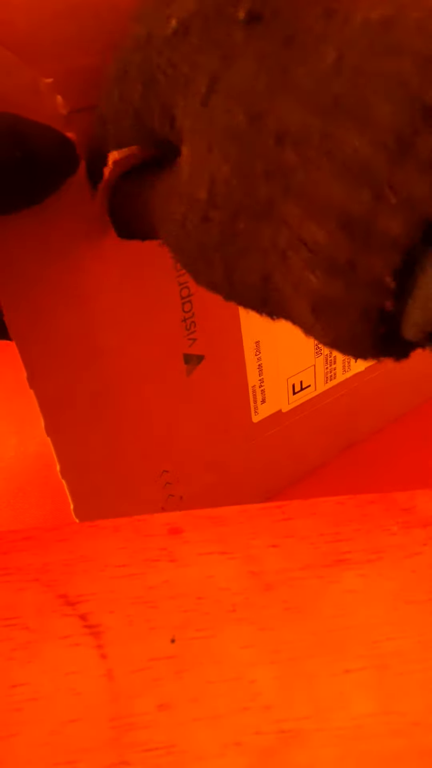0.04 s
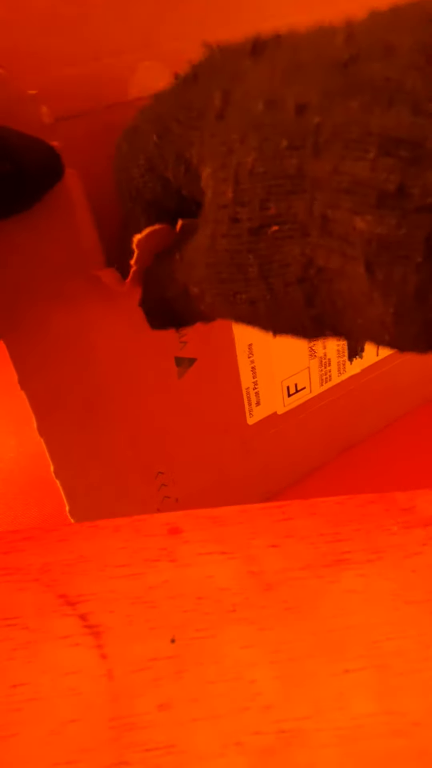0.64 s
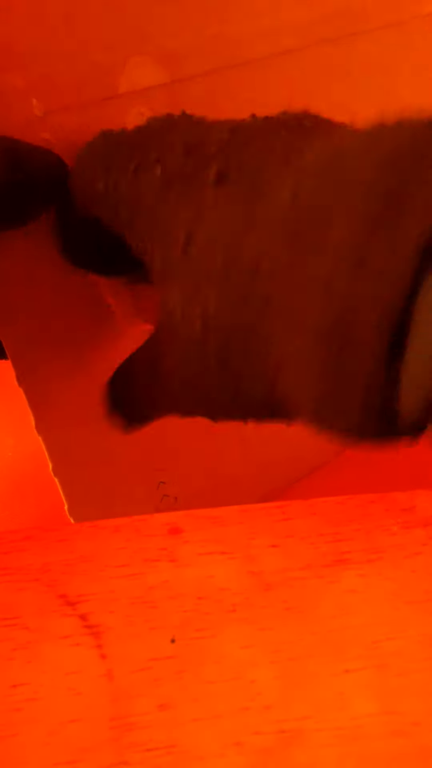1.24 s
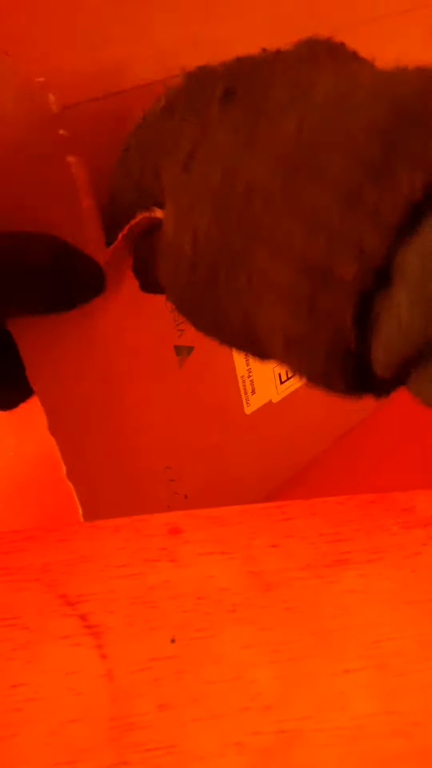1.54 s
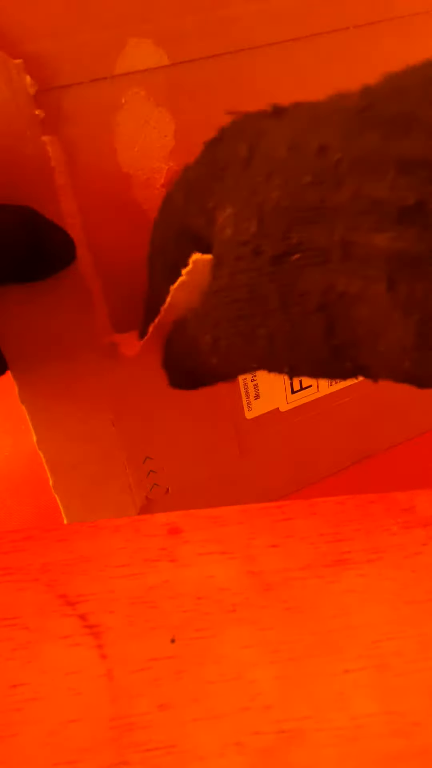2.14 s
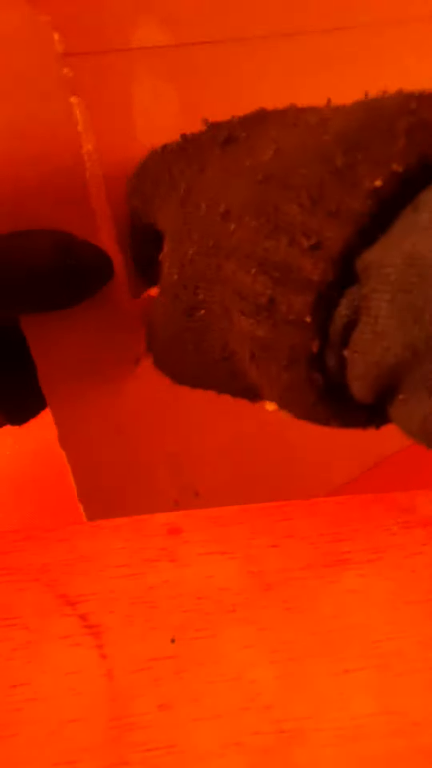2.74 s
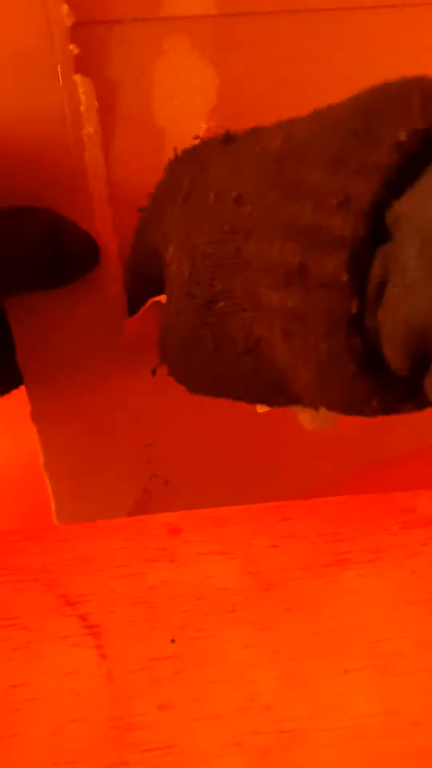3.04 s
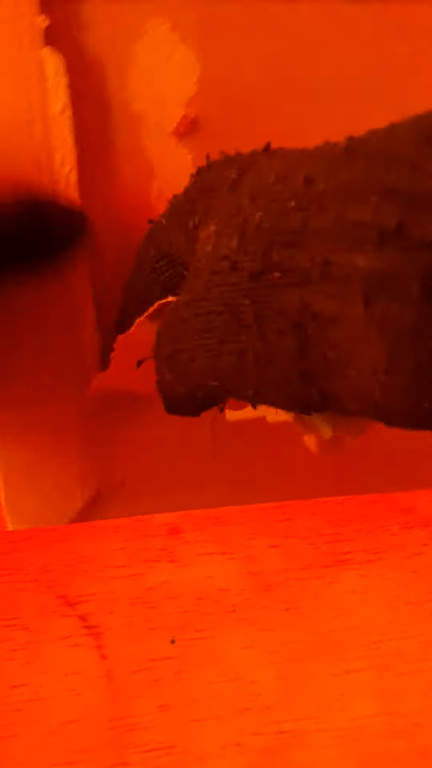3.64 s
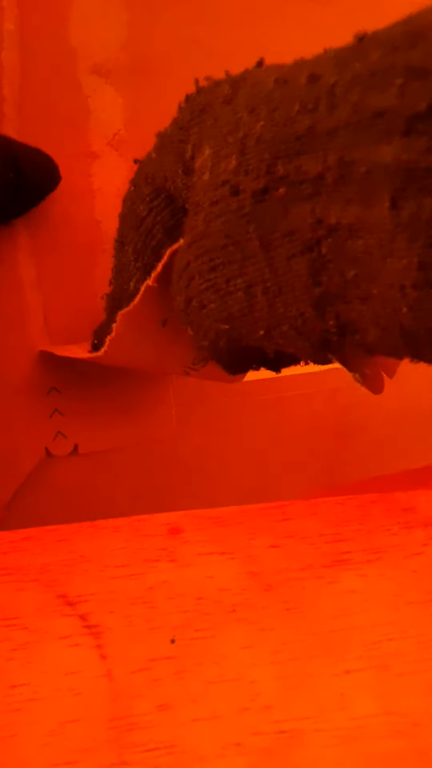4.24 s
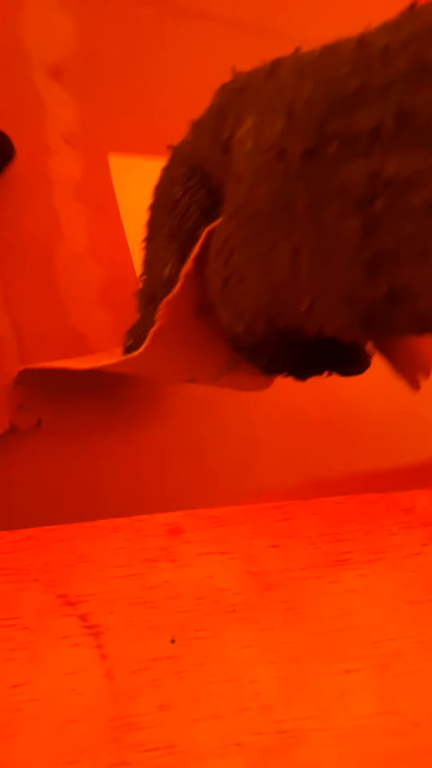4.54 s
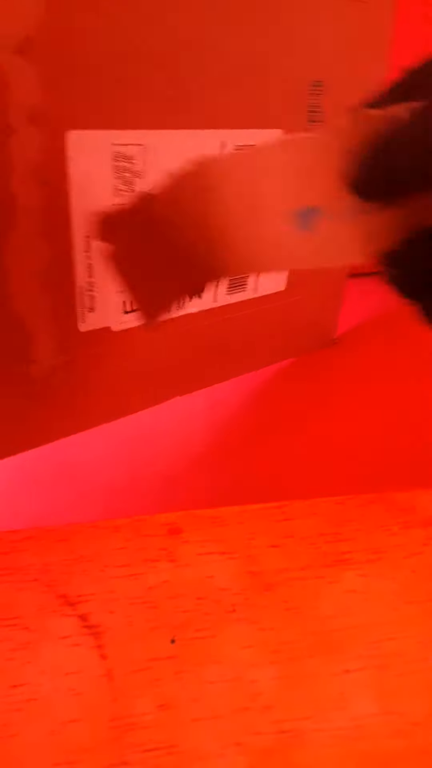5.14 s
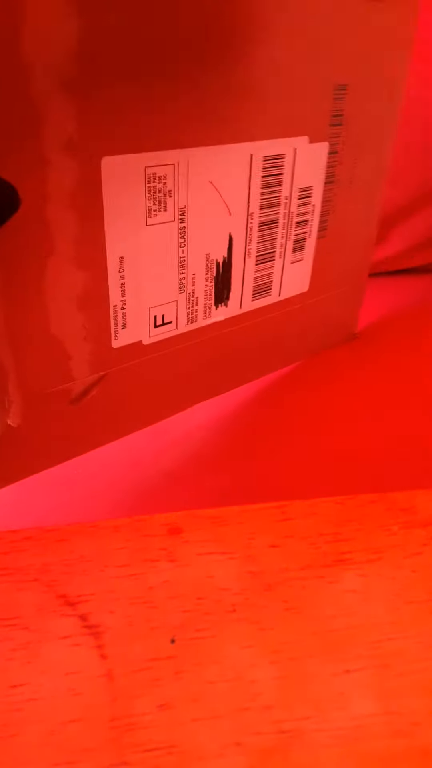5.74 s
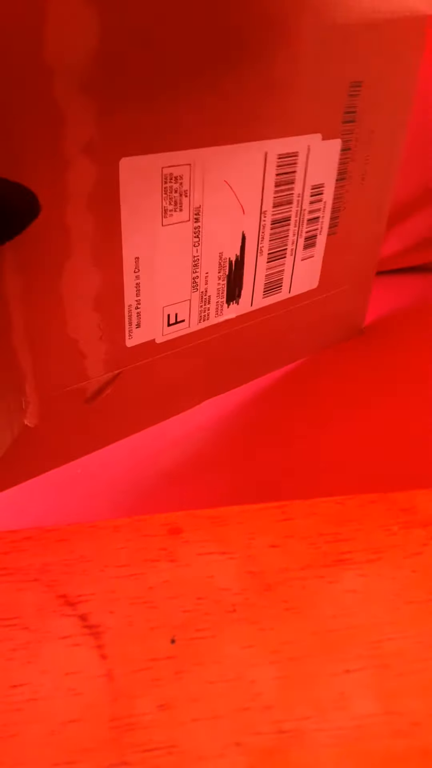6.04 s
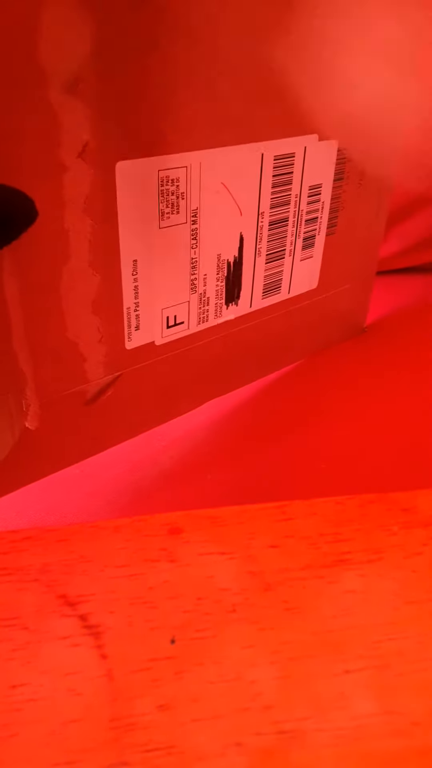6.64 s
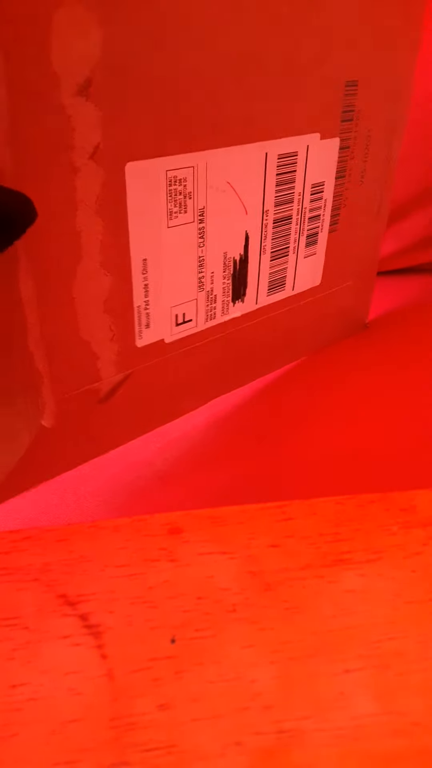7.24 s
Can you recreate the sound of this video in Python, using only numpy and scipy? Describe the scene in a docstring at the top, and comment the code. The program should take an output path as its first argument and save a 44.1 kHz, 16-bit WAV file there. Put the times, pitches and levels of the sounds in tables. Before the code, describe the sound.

Gloved hands tear a strip off a cardboard box in crackling bursts, with sharp snaps and hollow knocks on a wooden table.

```python
"""Cardboard tearing: gloved hands pull a strip off a box on a wooden table in a small room.
Breaking fibres crackle, fizz and shake the panels; glued spots snap; the hollow box pops.
The box knocks on the table as it is turned, panels thud, the flap groans, gloves rub.
The two ports of a nearby phone hear each spot with a lag; the right one sits in a resonant recess."""
import sys
import numpy as np
from scipy import signal
from scipy.fft import rfft, irfft
from scipy.io import wavfile

SR = 44100
rng = np.random.default_rng(int(sys.argv[2]) if len(sys.argv) > 2 else 0)


def unload_audio(sound):
    """Save the sound as a 16-bit wav file, at the path given as the first command line argument."""
    columns = np.transpose(np.atleast_2d(sound))
    # keep every value between -1 and 1, then stretch to whole-number steps
    steps = np.round(np.clip(columns, -1, 1) * 32767)
    wavfile.write(sys.argv[1], SR, steps.astype(np.int16))


N = 325458
TIME = np.arange(N) / SR

# Event and envelope levels are relative within a layer; panel and fizz are relative to the crackle.
# tear runs (time at full speed [s], length [s], crackle [dB], build-up [s], panel [dB], fizz [dB])
TEAR_RUNS = [(.49, 0.023, -34, .035, -4.5, -3.5), (0.572, 0.081, -32.5, .07, -2.5, -4),
             (1.595, 0.0038, -39, 0.09, 0.5, -4), (1.676, 0.027, -37.5, 0.087, 3.5, -3),
             (1.728, .16, -38.5, 0.096, 0, -5), (1.911, 0.027, -33.5, 0.034, 3.5, -3),
             (1.935, 0.022, -25, 0.013, 1.5, -6.5), (1.97, 0.018, -37.5, .03, -16, 5.5),
             (3.183, 0.13, -33.5, 0.048, -1.5, -5), (3.249, 0.015, -29, 0.068, 4.5, -1.5),
             (3.96, 0.051, -39, 0.015, -2.5, 0), (4.36, 0.091, -33, 0.048, -1.5, -1.5),
             (4.566, 0.03, -32, 0.025, -4, 4.5), (4.662, 0.023, -33, 0.07, -5.5, -3.5),
             (4.737, .003, -33.5, 0.01, -0.5, 2.5), (4.755, 0.015, -30, .006, 2, 0.5),
             (6.077, 0.0051, -39.5, 0.0029, 4.5, -8.5), (6.973, 0.02, -31.5, 0.0025, -4, -8),
             (7.005, 0.016, -26.5, 0.021, -6.5, -8.5)]
# flap gripped, bent or peeled slowly (middle [s], length [s], crackle [dB], panel [dB], fizz [dB])
RUSTLES = [(.287, 0.11, -41, -2.5, -8), (0.371, 0.047, -47.5, -2, -5), (0.963, 0.16, -50, 2, -3.5),
           (1.309, .08, -46.5, 1.5, -7), (1.42, .22, -46, -1.5, -3.5), (2.15, 0.066, -53, 0, -1),
           (2.331, 0.043, -49, 5, -11), (2.498, 0.1, -56.5, 1, -2.5), (2.792, 0.22, -48, -0.5, -6),
           (2.978, 0.23, -41, 0.5, -4.5), (3.092, 0.27, -44, -2.5, -6.5), (3.68, 0.17, -53.5, -7, -3.5),
           (3.881, 0.15, -45.5, -3.5, -4), (4.1, 0.24, -56.5, -1, 2), (4.3, 0.069, -43.5, -2.5, 0),
           (4.54, 0.11, -38, -3.5, 1.5), (4.712, .045, -38.5, -9, -2), (4.958, 0.074, -51.5, -5, -3.5),
           (5.249, 0.028, -54.5, -3.5, -3), (5.71, 0.037, -50.5, -16, -1.5),
           (5.786, 0.077, -52.5, -2.5, -2.5), (5.948, 0.089, -58, 0.5, -4.5),
           (6.424, 0.028, -47.5, -1.5, 1), (6.532, 0.034, -49.5, 1.5, -2), (6.63, 0.037, -47, 10.5, -4),
           (6.71, 0.037, -45.5, 7, -8), (6.78, 0.051, -55, -11, 5), (6.826, 0.031, -45, -19, 5),
           (7.252, 0.062, -52.5, 9, -7)]
# creasing under the hands (time [s], crackle [dB])
GRIP = [(0, -53), (.41, -59), (.76, -54), (.82, -68), (.9, -55.5), (1.22, -58.5), (2.3, -56.5),
        (2.395, -79), (2.48, -58.5), (5.1, -60), (5.33, -67), (5.88, -66), (6.05, -89), (6.15, -64.5),
        (6.85, -52.5), (6.95, -69), (7.1, -59.5), (7.38, -62.5)]
# radiating spots on the box (left-port lead [ms], level [dB])
SPOTS = [(.43, 2), (.57, -7), (1.18, -3.5)]
# travel of tear and hands (time [s], lead change [ms])
TRAVEL = [(0, -0.049), (2.5, -0.028), (4.7, -0.083), (5.7, -0.04), (7.38, 0.023)]
# breaking fibres (frequency [Hz], gain [dB])
CRACKLE_SPECTRUM = [(700, -16), (1400, -5), (1800, 2.5), (2300, -1), (3000, 0.5), (4200, 3.5), (5200, -2),
                    (7000, -6.5), (12000, -41)]
# paper fizz (frequency [Hz], gain [dB])
FIZZ_SPECTRUM = [(3500, -29.5), (6500, -7.5), (8500, 4), (10000, 2), (11500, 6.5), (16000, -1)]
# panel rattle (frequency [Hz], gain [dB])
PANEL_SPECTRUM = [(20, -53), (70, 0), (130, -5), (210, 2.5), (350, -3), (500, -6), (760, -1.5),
                  (1050, -6.5), (1300, -4.5), (1600, -17), (2300, -67.5)]
# glued spots and creases giving way (time [s], level [dB], nominal pitch [Hz], fizz [dB])
SNAPS = [(.099, -27.5, 4200, -7.5), (.2425, -23.5, 2300, -16), (0.2777, -23, 2150, -28),
         (.3563, -18.5, 2060, -18), (0.4273, -21.5, 2880, -21), (.506, -21.5, 4000, 1),
         (0.542, -15.5, 2500, -21), (.562, -3.5, 2550, -35), (.574, -9, 2450, -32),
         (1.9315, -18, 1240, -14), (1.9588, -5.5, 3720, -9.5), (2.66, -34, 2500, -6),
         (2.786, -31, 2500, -3.5), (3.0759, -17, 2500, -30), (3.1798, -20, 2500, -21),
         (3.956, -27, 2980, -14), (4.113, -38.5, 4000, 5.5), (4.416, -17.5, 2620, -2),
         (4.565, -9, 3770, -11), (4.7447, -5.5, 3330, -4), (4.759, -23, 3680, 0), (5.787, -27, 4160, -12),
         (6.0757, -15, 2550, -27), (6.231, -28.5, 3900, -10), (6.242, -30, 3900, -9),
         (6.622, -32.5, 1560, -2), (6.7016, -37, 2470, 1.5), (6.971, -20.5, 3050, -5),
         (6.988, -5.5, 2800, -14), (7.007, -5, 3970, -30), (7.017, -7.5, 3300, -13), (7.027, -8, 3360, -19)]
# liner letting go (time [s], level [dB])
POPS = [(.356, -31.5), (.488, -26), (.503, -26.5), (1.907, -23.5), (2.781, -31), (3.2, -28), (3.252, -18),
        (3.773, -37.5), (4.82, -28.5)]
# box hitting the table (time [s], level [dB], blow pitch [Hz])
KNOCKS = [(.103, -30.5, 333), (1.934, -13.5, 755), (2.325, -37, 506), (3.078, -27.5, 393),
          (3.258, -22, 345), (5.621, -37, 820), (5.91, -30, 780), (6.408, -41, 500), (6.571, -31, 417),
          (6.622, -20, 567), (6.651, -29, 305), (6.706, -21, 216), (6.719, -8.5, 373), (6.874, -25, 865),
          (6.899, -11, 392), (7.069, -19.5, 334), (7.211, -36, 360)]
# box resonances (frequency [Hz], relative gain [dB], t60 [s])
BOX_MODES = [(283.6, 7, 0.22), (363, 8.5, 0.066), (567, -10.5, 0.23), (667, 4.5, 0.024), (801.5, 1, 0.044),
             (916, -39, 0.048), (1330, 9.5, 0.21), (2473, 10, 0.052), (2600, -6, 0.18), (3190, 9, 0.038),
             (3990, -10, 0.044), (3710, 2, 0.044), (4266, 7, 0.034), (5656, 9, 0.16)]
# table resonances (frequency [Hz], relative gain [dB], t60 [s])
TABLE_MODES = [(277.4, 4.5, 0.11), (546, 8, 0.092)]
# panels buckling and springing back (time [s], level [dB], pitch [Hz])
FLEXES = [(.101, -34, 154), (1.792, -24, 190), (1.936, -28, 77.5), (1.953, -18, 274), (2.089, -31, 103),
          (2.137, -30.5, 147), (3.254, -15, 158), (3.275, -14.5, 91), (3.294, -21.5, 132),
          (4.565, -21, 206), (4.755, -19, 75.6), (4.789, -20, 162), (6.0766, -25.5, 300), (6.08, -36, 85),
          (6.703, -21.5, 110), (6.722, -29, 71), (6.783, -28.5, 117), (6.989, -20, 302),
          (7.009, -23.5, 352), (7.072, -29, 92.5)]
# gloves sliding (time [s], level [dB])
GLOVE_SLIDE = [(0, -90), (.7, -48), (.85, -64.5), (1.15, -50.5), (2.2, -74), (2.4, -61.5), (2.6, -71),
               (3.5, -50.5), (4.1, -65), (4.96, -53.5), (5.05, -78), (5.33, -65), (5.43, -56), (5.78, -57),
               (6.03, -74), (6.15, -59), (6.4, -51.5), (7.38, -52.5)]
# glove rub on the hollow box (frequency [Hz], gain [dB])
GLOVE_SPECTRUM = [(60, -13), (200, -7.5), (300, -0.5), (370, -0.5), (520, -9.5), (900, -26), (2000, -25)]
# room noise (frequency [Hz], gain [dB])
ROOM_NOISE_SPECTRUM = [(20, -77), (50, -46), (100, 4), (300, -41), (550, -19), (1500, -19), (5000, -13),
                       (16000, -25)]
# right-port recess (frequency [Hz], gain [dB])
RECESS_SPECTRUM = [(80, -6.5), (200, -4), (430, 5.5), (600, -6.5), (740, 2.5), (840, 10), (1080, 1.5),
                   (1400, -2.5), (1850, -9), (2300, 9.5), (2600, 3), (2950, -1), (4400, -3), (6400, -5.5),
                   (9000, -4), (15000, 2.5)]

TOP_HZ = 16000


def tearing():
    """A harder pull breaks more fibres; they go in clumps as the tear catches across the flutes."""
    crackle_db, panel_db, fizz_db = pull_levels_db()
    breaks_per_s = 1300 * undb(.5 * (crackle_db + 40.5))
    clumps = undb(2 * wander(260) + .12 * wander(50))
    breaks = sum(undb(db) * travelling(clumps * fibres(breaks_per_s), lead_ms) for lead_ms, db in SPOTS)
    breaks = through(breaks, box_response(ring_db=-7.5))
    # one excitation, three colours in shifting proportions
    crackle = level(through(breaks, colour(CRACKLE_SPECTRUM)), .037) * undb(crackle_db)
    fizz = level(through(breaks, colour(FIZZ_SPECTRUM)), 2.1) * undb(fizz_db + .15 * wander(120))
    panel = level(through(breaks, colour(PANEL_SPECTRUM)), -2.23) * undb(panel_db + 1.13 * wander(120))
    return crackle + fizz + panel


def fibres(breaks_per_s, spread_db=.5):
    """Random fibre breaks of similar size over smooth rubbing."""
    breaks = rng.random(N) < breaks_per_s / SR
    sizes = undb(spread_db * np.minimum(rng.exponential(size=N), 3.8))
    signs = rng.choice([-1, 1], N)
    rubbing = .45 * rng.standard_normal(N)
    return level(breaks * sizes * signs / np.sqrt(breaks_per_s), 0) + rubbing


def pull_levels_db():
    """Crackle, panel and fizz envelopes: grip, rustles and tear runs add in power."""
    time_s = TIME[::32]
    grip_db = np.interp(time_s, *np.transpose(GRIP))
    power = undb(grip_db + np.c_[[0, -1, -4.5]]) ** 2  # rows: crackle, panel, fizz
    for middle_s, length_s, db, panel_db, fizz_db in RUSTLES:
        shape_db = swell_db(time_s - middle_s, length_s)
        power += undb(db + np.c_[[0, panel_db, fizz_db]] + shape_db) ** 2
    release_db_per_s = np.c_[[248.5, 244, 248.5]]
    for peak_s, length_s, db, build_up_s, panel_db, fizz_db in TEAR_RUNS:
        shape_db = tear_run_db(time_s - peak_s, length_s, build_up_s, release_db_per_s)
        power += undb(db + np.c_[[0, panel_db, fizz_db]] + shape_db) ** 2
    return [np.interp(TIME, time_s, 10 * np.log10(row)) for row in power]


def tear_run_db(age_s, length_s, build_up_s, release_db_per_s, sag_db_per_s=38):
    """One run gains 20 dB over the build-up, slackens, then dies away."""
    rise_db = 20 * np.minimum(age_s, 0) / build_up_s
    sag_db = sag_db_per_s * np.clip(age_s, 0, length_s)
    release_db = release_db_per_s * np.maximum(age_s - length_s, 0)
    return rise_db - sag_db - release_db


def swell_db(offset_s, length_s, edge_db=-8.5):
    """Smooth rise and fall around zero offset."""
    return edge_db * (2 * offset_s / length_s) ** 2


def snaps():
    """Glue or a crease gives: a jerk of the stiff liner and a short spray of breaking fibres."""
    track = np.zeros((2, N))
    decay = fade(t60_s=.009)
    for time_s, db, hz, fizz_db in SNAPS:
        crack_noise, fizz_noise = rng.standard_normal((2, SR // 4))[:, :len(decay)]
        crack = .22 * level(band(crack_noise, hz / 2.3, hz * 2), 0)
        fizz = level(band(fizz_noise, 5900, TOP_HZ), fizz_db)
        cycles = 1.15 * hz * TIME[:len(decay)]
        jerk = np.sin(2 * np.pi * cycles) * np.exp(-.8 * cycles)  # a cycle or two: wideband
        snap = (crack + fizz) * decay + 1.5 * band(jerk, 980, 13000)
        add(track, time_s, ports(undb(db) * snap, lead_ms=.43, scatter_db=-6))
    return track


def pops(centre_hz=815, width_hz=370):
    """The liner lets go: a dry burst around the resonance of the hollow box."""
    track = np.zeros(N)
    decay = fade(t60_s=.032)
    for time_s, db in POPS:
        noise = rng.standard_normal(SR // 4)[:len(decay)]
        burst = band(noise, centre_hz - width_hz / 2, centre_hz + width_hz / 2) * decay
        add(track, time_s, level(burst, db) * np.sqrt(np.mean(decay ** 2)))
    return ports(track, lead_ms=.31, scatter_db=-13)


def knocks():
    """A blow swings the panel out and back; box and table ring, loose flaps shudder."""
    track = np.zeros((2, N))
    ringing = box_response(ring_db=-3.5) + resonances(TABLE_MODES, ring_db=3.5)
    for time_s, db, hz in KNOCKS:
        swing = np.pi * hz * (TIME[:SR // 100] - .002)
        blow = (1 - 2 * swing ** 2) * np.exp(-swing ** 2)
        shudder = echoes(t60_s=.17, db=-4, low_hz=215, high_hz=6000, samples=11025)[0]
        hit = np.convolve(ringing + shudder, blow)
        add(track, time_s - .0006, ports(undb(db - 6) * hit, lead_ms=.05, scatter_db=1))
    return track


def flexes():
    """Broad panels thud as their load lets go; lower notes ring longer."""
    track = np.zeros(N)
    for time_s, db, hz in FLEXES:
        decay = fade(t60_s=.083 * (100 / hz) ** .28)
        cycles = hz * TIME[:len(decay)]
        attack = 1 - np.exp(-2 * cycles)
        add(track, time_s, undb(db) * attack * decay * np.sin(2 * np.pi * cycles))
    return ports(track, lead_ms=.2, scatter_db=-8)


def groan(middle_s=4.31, length_s=.13, middle_hz=190, sag_hz_per_s=220, peak_db=-37.5):
    """Stick-slip sustains one panel note; its level wavers and its pitch sags as the flap bends."""
    offset_s = TIME - middle_s
    hz = middle_hz - sag_hz_per_s * np.clip(offset_s, -length_s, length_s)
    db = peak_db + swell_db(offset_s, length_s) + wander(60)
    return undb(np.maximum(db, -200)) * np.sin(2 * np.pi * np.cumsum(hz) / SR)


def gloves():
    """Knitted cloth drags unevenly over the board; the hollow box murmurs."""
    drag = rng.standard_normal(N) * undb(2 * wander(27))
    rub = ports(through(drag, colour(GLOVE_SPECTRUM)), lead_ms=.1, scatter_db=-14)
    return level(rub, -3.5) * undb(np.interp(TIME, *np.transpose(GLOVE_SLIDE)))


def room_noise():
    """Faint steady noise, mostly common to both ports."""
    noise = rng.standard_normal(N) + .5 * rng.standard_normal((2, N))
    return level(through(noise, colour(ROOM_NOISE_SPECTRUM)), -66.5)


def box_response(ring_db):
    """The push itself, then the box modes."""
    response = resonances(BOX_MODES, ring_db)
    response[0] += 1
    return response


def resonances(modes, ring_db, samples=11025):
    """Damped modes after a unit push."""
    response = np.zeros(samples)
    for hz, db, t60_s in modes:
        decay = np.exp(-np.log(1000) * TIME[:samples] / t60_s)
        response += undb(db + ring_db) * 2 * decay / decay.sum() * np.cos(2 * np.pi * hz * TIME[:samples])
    return response


def travelling(x, lead_ms, jitter_ms=.041, samples=12000):
    """Hands and flap move: the lead drifts and scatter patterns crossfade."""
    track, hop = np.zeros((2, N)), samples // 2
    window = signal.windows.hann(samples, sym=False)
    padded = np.pad(x, (hop, samples))
    for start in range(0, N + hop, hop):
        drift_ms = np.interp(start / SR, *np.transpose(TRAVEL))
        moved_ms = abs(lead_ms + drift_ms + jitter_ms * rng.standard_normal())
        piece = ports(padded[start:start + samples] * window, moved_ms, scatter_db=-2.5)
        add(track, max(start - hop, 0) / SR, piece[:, max(hop - start, 0):])
    return track


def ports(x, lead_ms, scatter_db):
    """Direct sound reaches the left port first; box, hands and table scatter it."""
    response = echoes(t60_s=.03, db=scatter_db, low_hz=900, high_hz=18000, samples=2048)
    response[0, 0] += 1
    response[1, int(lead_ms * SR / 1000)] += 1
    return through(x, response)


def echoes(t60_s, db, low_hz, high_hz, samples):
    """Dense reflections, uncorrelated between ports."""
    decay = np.exp(-np.log(1000) * TIME[:samples] / t60_s)
    tail = band(rng.standard_normal((2, samples)), low_hz, high_hz) * decay
    return tail * undb(db) / np.sqrt(np.sum(decay ** 2))


def colour(spectrum, samples=2048):
    """Minimum-phase response of a spectrum table."""
    hz, db = np.transpose(spectrum)
    grid_hz = np.maximum(np.arange(samples // 2 + 1) * SR / samples, 1)
    gain = undb(np.interp(np.log(grid_hz), np.log(hz), db))
    cepstrum = irfft(np.log(gain))
    cepstrum[1:samples // 2] *= 2
    cepstrum[samples // 2 + 1:] = 0
    return irfft(np.exp(rfft(cepstrum)))


def through(x, response):
    """Convolve with a mono or stereo response."""
    return signal.oaconvolve(np.atleast_2d(x), np.atleast_2d(response), axes=1)[:, :N]


def band(x, low_hz, high_hz):
    """Gentle band-pass."""
    return signal.sosfilt(signal.butter(2, [low_hz, high_hz], "band", fs=SR, output="sos"), x)


def fade(t60_s):
    """Exponential decay, cut at -60 dB."""
    return np.exp(-np.log(1000) * TIME[:int(t60_s * SR)] / t60_s)


def wander(rate_hz):
    """Smooth random curve, spread near 1."""
    knots_s = np.arange(0, TIME[-1] + 1, 1 / rate_hz)
    return np.interp(TIME, knots_s, rng.standard_normal(N)[:len(knots_s)])


def add(track, time_s, sound):
    """Mix a sound in."""
    start = int(round(time_s * SR))
    track[..., start:start + sound.shape[-1]] += sound[..., :N - start]


def level(x, rms_db):
    """Set the rms of the channel mean."""
    return x * undb(rms_db) / np.sqrt(np.mean(np.atleast_2d(x).mean(axis=0) ** 2))


def undb(db):
    """Decibels to amplitude."""
    return 10 ** (np.asarray(db) / 20)


def scene():
    """Box and hands, room reflections, room noise."""
    box = tearing() + snaps() + pops() + knocks() + flexes() + groan() + gloves()
    reflections = through(box, echoes(t60_s=.33, db=-17.5, low_hz=118, high_hz=6140, samples=22050))
    return box + reflections + room_noise()


def record(dry):
    """The recess colours the right port; the phone clips at full scale and cuts the top."""
    heard = np.vstack([dry[0], through(dry[1], colour(RECESS_SPECTRUM))])
    low_pass = signal.ellip(10, .2, 70, TOP_HZ, fs=SR, output="sos")
    return signal.sosfilt(low_pass, np.clip(heard, -1, 1))


dry = scene()
out = record(dry)
unload_audio(out)
```